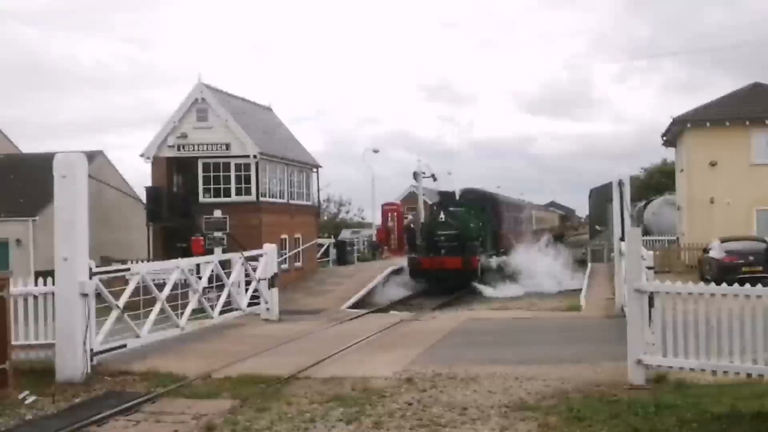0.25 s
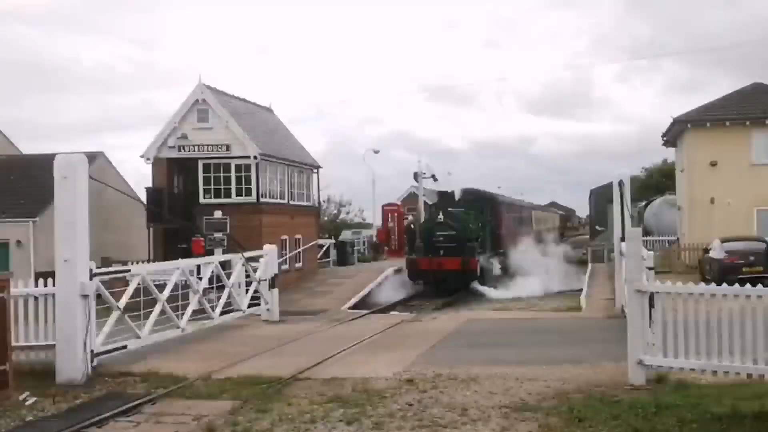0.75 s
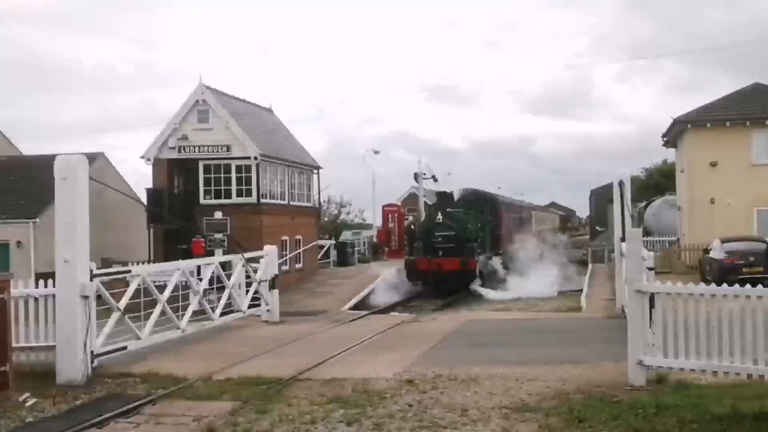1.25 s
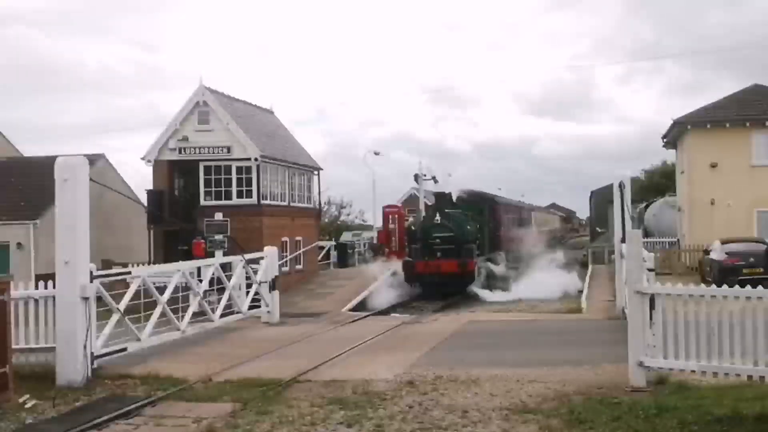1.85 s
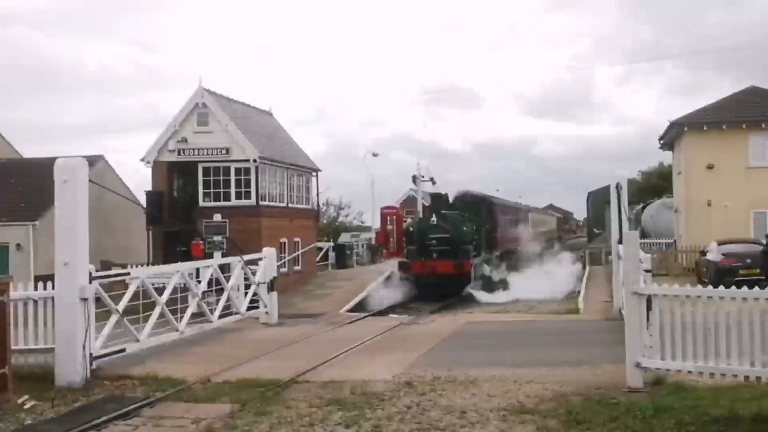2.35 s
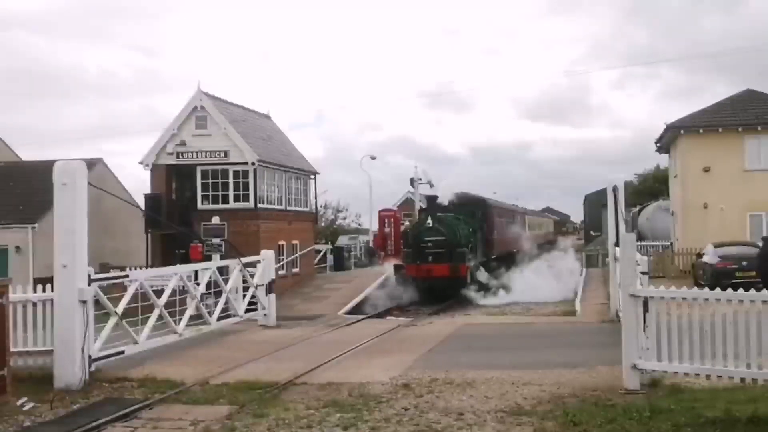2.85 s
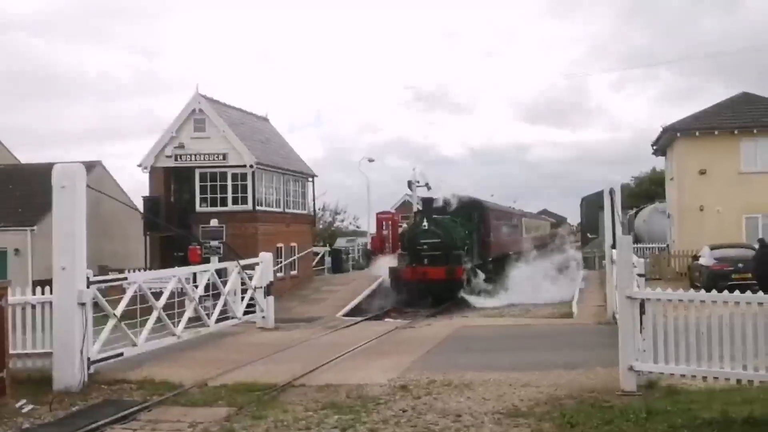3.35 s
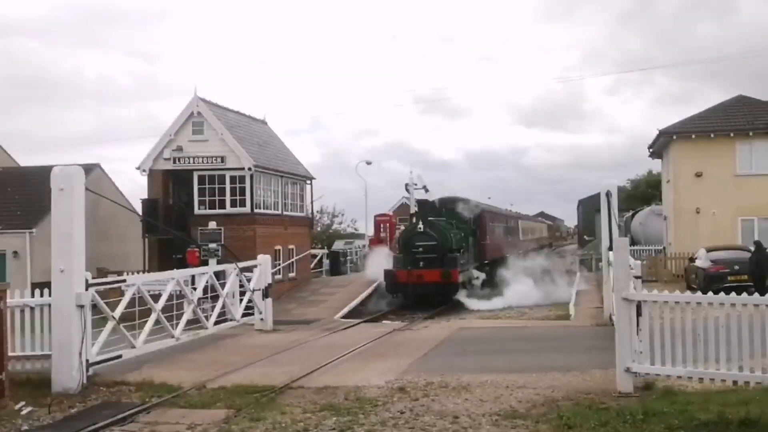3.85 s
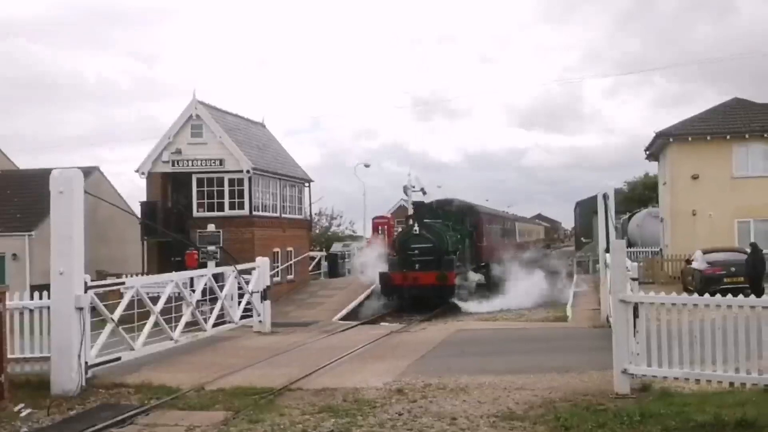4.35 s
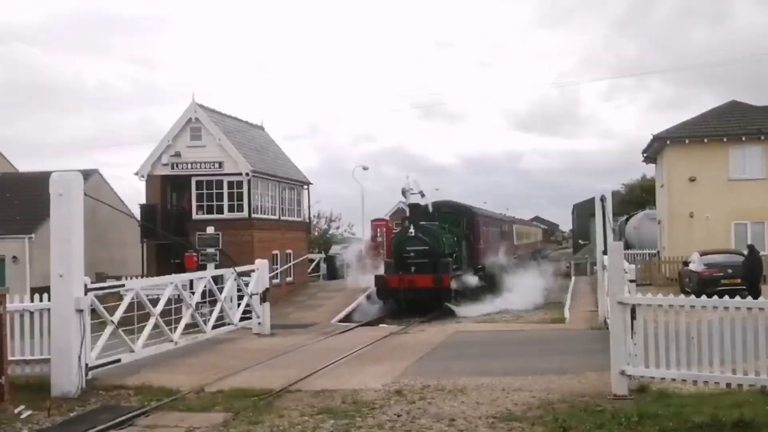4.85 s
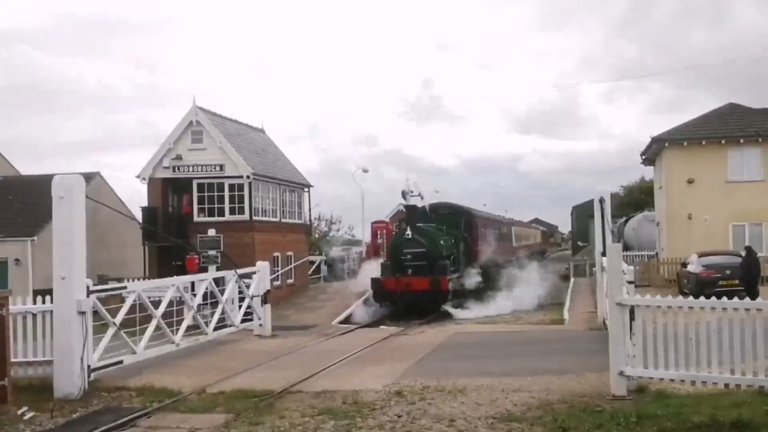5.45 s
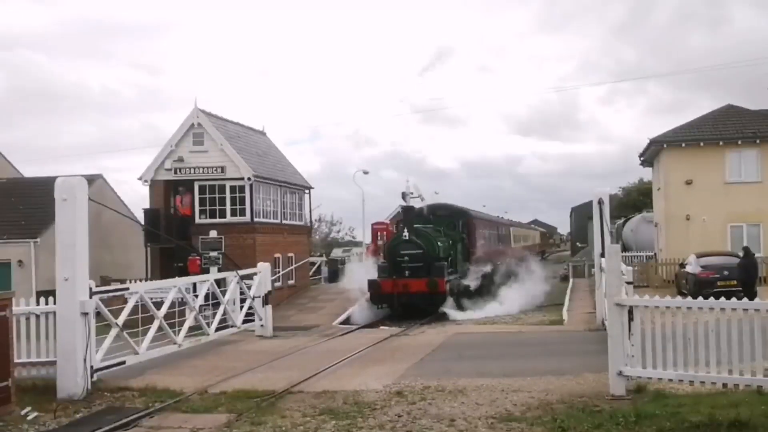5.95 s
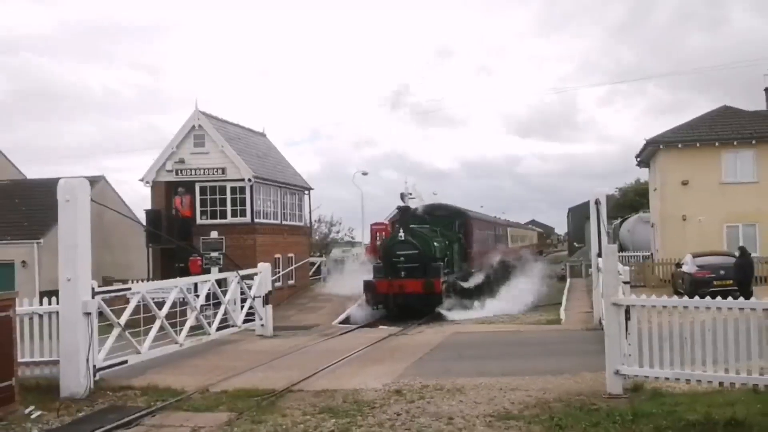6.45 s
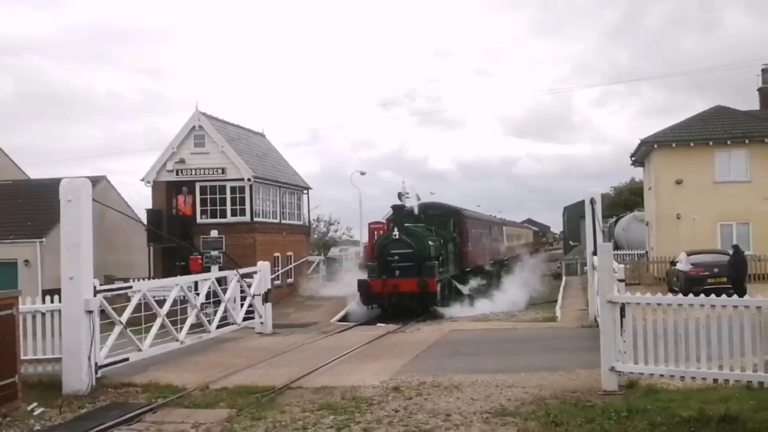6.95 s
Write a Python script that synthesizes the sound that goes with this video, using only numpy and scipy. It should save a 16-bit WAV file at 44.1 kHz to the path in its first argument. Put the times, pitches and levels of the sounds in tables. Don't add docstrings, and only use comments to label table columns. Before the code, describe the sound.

At an open-air railway crossing, a steam engine rolls off slowly, its drain cocks spraying a sharp, high hiss that falters and spurts. Soft wide puffs of steam rise and cut off at uneven intervals above a dull outdoor background and low far-off hum. Late on, wind buffets the single microphone with low thuds and crackly flaps; the hiss then drops away. The sound is close to mono, with a dull top end.

```python
import sys
import numpy as np
from scipy import signal
from scipy.fft import rfft, irfft
from scipy.io import wavfile
from scipy.ndimage import uniform_filter1d

SR = 44100
rng = np.random.default_rng(int(sys.argv[2]) if len(sys.argv) > 2 else 0)


def field_ratio(decibels):
    return 10 ** (np.asarray(decibels, dtype=float) / 20)


def transcribe(u):
    v = np.clip(np.atleast_2d(u).T, -1, 1)
    q = np.round(v * 32767).astype(np.int16)
    wavfile.write(sys.argv[1], SR, q)


N = 317961
HZ = np.arange(N // 2 + 1) * SR / N + 1e-3

# frequency in Hz, density in dB per Hz.
HISS_COLOUR = [(520, -41), (680, -23.5), (1000, -19.5), (1600, -19.5), (2200, -18.5), (2700, -14),
               (3100, -18.5), (4100, -13), (4900, -13.5), (5400, -12), (6700, -2), (7350, -6.5),
               (7600, -22), (7800, -43), (7880, -73.5)]
# frequency in Hz, width in Hz, lift in dB.
PIPE_MODES = [(1350, 22, 5), (2600, 460, 2), (3253, 100, 5), (3770, 61, -0.2), (4440, 180, 3),
              (5430, 450, 3.5), (6955, 290, 3)]
STEAM_EDGES_HZ = [2150, 3050, 5050]
# time in seconds, level in dB.
JET_PRESSURE = [(0, -41), (.38, -44), (.65, -38.5), (1.08, -38), (1.2, -35.5), (1.88, -36), (1.97, -39.5),
                (2.45, -38), (2.8, -45.5), (3.25, -47), (4.05, -43), (4.25, -44.5), (4.85, -39), (5.3, -44),
                (5.95, -40.5), (6.64, -42.5), (6.77, -53.5), (7.21, -51.5)]
# time in seconds, change in dB, length in seconds.
SPUTTERS = [(0.397, 0, 0.036), (0.763, -1, 0.016), (.92, -4, 0.027), (1.125, -4.5, 0.015),
            (1.167, 3.5, 0.025), (1.372, -2, .05), (1.556, 3.5, 0.019), (1.93, -10, 0.015),
            (1.968, -5, 0.0093), (2.128, -6, 0.013), (2.31, 3.5, 0.015), (3.4, -1, 0.014),
            (3.437, 3.5, .05), (4.08, 0.5, .03), (4.391, -3, 0.022), (4.72, -5, 0.026),
            (5.115, -3.5, 0.077), (5.36, 4.5, 0.099), (5.43, -4, 0.14), (6.243, -3, .08),
            (6.379, 2.5, 0.095), (6.459, -3.5, 0.036), (6.596, -2.5, 0.0076)]
# start in seconds, length in seconds, level in dB,
# brightness in dB, how far only the pipe sings in dB.
PISTON_BLOWS = [(0.21, 0.46, -53.5, -2, 0.5), (0.745, 0.39, -58, -4, 0), (2.053, .43, -51.5, -1, 0.5),
                (2.515, .58, -53.5, 6.5, 21.5), (3.18, 0.31, -60.5, -9, -1.5), (4.282, .42, -61.5, 1, -4.5),
                (4.799, 0.071, -59, 6.5, 1.5), (5.136, .1, -53.5, 4.5, 2), (5.302, .08, -54, 3.5, -0.5),
                (5.461, .11, -57.5, -3, -4.5), (5.637, .5, -62, 11, 3.5), (6.225, .47, -57.5, 5, 1.5),
                (7.028, .3, -67.5, -3.5, 3)]
REST_DB = [-56.5, -59, -61]
REST_FOLLOWS = [0.36, .05, -.05]
# time in seconds, frequency in Hz, change in dB.
GROUND_HOLLOW = [(0, 4900, 1.5), (.25, 4900, 0), (.95, 4850, -2.5), (1.15, 3300, -2.5), (1.9, 3300, -4),
                 (2.3, 3900, 1), (2.8, 4300, -0.5), (3.3, 4200, -7), (3.6, 4000, -5.5), (4.15, 3950, -7),
                 (4.35, 4100, -2), (4.75, 4300, -8.5), (5.08, 4300, -7.5), (5.2, 4300, -3),
                 (5.85, 4400, -5.5), (6.4, 4500, 4.5), (6.75, 4400, -13.5), (7.21, 4300, -5)]
# time in seconds, frequency in Hz, change in dB.
WALL_HOLLOW = [(0, 4900, -2), (2.5, 4900, 1.5), (2.85, 5000, -4.5), (3.2, 5000, 3), (3.6, 5100, -1.5),
               (4.2, 4900, -4), (4.4, 4900, 2), (4.9, 4950, -2.5), (5.15, 4930, 1), (7.21, 4900, 0)]
# time in seconds, frequency in Hz, change in dB.
PIPE_NOTE = [(0, 2720, 3), (.7, 2700, 0.5), (1.3, 2700, 2.5), (2.0, 2720, 1), (2.3, 2270, 2.5),
             (3.1, 2400, 3), (3.5, 1800, 4), (4.1, 1810, -4.5), (4.5, 2130, 4), (5.8, 2240, 5),
             (6.2, 2600, 0), (7.21, 2600, -2)]
# time in seconds, peak in dB, pitch in Hz, push 1 or suck -1.
SLAPS = [(5.122, -30, 188, 1), (5.182, -35, 169, 1), (5.19, -31, 258, 1), (5.326, -29, 230, 1),
         (5.372, -34.5, 241, 1), (5.401, -35, 217, 1), (5.439, -34, 300, 1), (5.496, -26.5, 188, 1),
         (5.509, -26.5, 177, 1), (5.547, -30, 280, 1), (5.59, -17.5, 247, -1), (5.663, -29.5, 162, 1),
         (5.684, -26, 265, -1), (5.721, -23, 230, -1), (5.728, -25, 400, 1), (5.736, -21.5, 420, -1),
         (5.746, -26, 445, 1), (5.762, -21.5, 420, -1), (5.781, -18, 294, 1), (5.86, -28, 199, -1),
         (5.904, -34, 210, 1), (6.023, -30.5, 152, -1), (6.047, -35, 247, 1), (6.082, -29, 318, 1),
         (6.097, -31.5, 358, 1), (6.272, -31, 225, 1), (6.281, -31, 352, -1), (6.308, -33.5, 218, -1),
         (6.335, -36, 338, 1), (6.532, -36, 210, 1)]
# time in seconds, rumble in dB.
BREEZE = [(0, -74), (.4, -74.5), (.9, -76.5), (1.8, -84), (2.7, -81.5), (3.3, -67.5), (4.7, -69),
          (5.05, -57), (5.5, -47.5), (6.05, -50), (6.2, -59), (6.55, -58.5), (6.66, -73), (7.21, -74)]
# middle in seconds, length in seconds, rumble in dB, flutter over rumble in dB.
GUSTS = [(.33, 0.13, -68, 8), (.82, 0.063, -73.5, -2), (1.524, 0.11, -77, 17.5), (2.226, 0.092, -70, 0),
         (2.55, 0.063, -76, -12), (2.827, 0.14, -67.5, 15), (3.346, 0.079, -56, 0),
         (3.433, 0.045, -54, -12), (3.562, 0.07, -65, 6.5), (3.823, 0.086, -63, 7), (4.797, .05, -57, 9),
         (4.883, .04, -64, 7), (5.036, 0.045, -50.5, -0.5), (5.141, 0.069, -48.5, 9),
         (5.232, 0.055, -46.5, 2), (5.415, 0.085, -45, -1), (5.548, 0.08, -47.5, 9),
         (5.59, 0.032, -51, 14.5), (5.662, .04, -49, 11.5), (5.74, 0.056, -44.5, 16.5),
         (5.803, 0.033, -39, -5), (5.883, 0.1, -54.5, 9), (6.035, 0.048, -48, 3), (6.09, 0.037, -37.5, -7),
         (6.273, 0.022, -48, 11), (6.342, 0.07, -52, 9.5), (6.394, .07, -50, 5), (6.526, 0.11, -44, -20.5),
         (6.788, 0.093, -55.5, 4), (6.964, 0.024, -48.5, -11)]
# time in seconds, change in dB, length in seconds.
DUCKS = [
    (5.592, -4.5, .03),
    (5.744, 1, 0.042),
]
# frequency in Hz, width in Hz, depth in dB.
BODY_DIPS = [(420, 110, -4.5), (834, 148, -13), (1220, 160, -2), (1630, 120, -4.5), (3635, 140, -6),
             (4060, 200, -8.5), (4760, 220, -2)]
# frequency in Hz, level in dB rms.
MOTOR_HUM = [(80.7, -56), (161.5, -69.5), (242.2, -71), (323.0, -77)]
# time in seconds, overtone change in dB.
MOTOR_LOAD = [
    (0, -10),
    (1.3, -1),
    (1.55, -5.5),
    (2.0, -3.5),
    (2.8, 2.5),
    (3.6, 2),
    (4.6, 0.5),
    (7.21, 0.5),
]
# frequency in Hz, density in dB per Hz.
FLOOR_COLOUR = [(60, -22.5), (102, 0.5), (125, -22.5), (250, -19.5), (500, -13), (690, -9), (1000, -15.5),
                (1400, -38), (2500, -58)]
# middle in seconds, length in seconds, lift in dB.
FAR_SWELL = (0.48, .6, 4.4)
# time in seconds, low edge in Hz, high edge in Hz, level in dB.
CHANNEL_SPLITS = [(0.687, 5800, 6850, -45), (.923, 4260, 6280, -51), (.967, 4270, 5680, -49),
                  (2.777, 6280, 7620, -50), (2.957, 4700, 5700, -58), (3.865, 6280, 7500, -46),
                  (3.864, 4960, 5680, -58), (4.867, 4840, 6000, -52.5), (5.261, 5800, 6850, -48)]


def rms_one(x):
    return x / np.sqrt(np.mean(x ** 2) + 1e-20)


def in_time(rows):
    s, *columns = np.transpose(rows)
    return [np.interp(np.arange(N) / SR, s, c) for c in columns]


def at_hz(points):
    hz, db = np.transpose(points)
    return np.interp(np.log(HZ), np.log(hz), db)


def bumps(modes):
    return sum(db / (1 + (2 * (HZ - hz) / width) ** 2) for hz, width, db in modes)


def bell(s, length):
    return 2 ** -(2 * (np.arange(N) / SR - s) / length) ** 2


def drift(rate):
    r = np.exp(-2 * np.pi * rate * 40 / SR)
    slow = signal.lfilter([1], [1, -2 * r, r * r], rng.standard_normal(N // 40 + 2002))[2000:]
    return np.interp(np.arange(N) / 40, np.arange(len(slow)), rms_one(slow))


def band(low_hz, high_hz, order):
    sos = signal.butter(order, [low_hz, high_hz], "band", fs=SR, output="sos")
    return rms_one(signal.sosfilt(sos, rng.standard_normal(N + SR))[SR:])


def evened(x, seconds):
    power = uniform_filter1d(x ** 2, size=int(seconds * SR))
    return rms_one(x / (power + .05) ** .4)


def power_db(parts):
    return 10 * np.log10(sum(part ** 2 for part in parts))


def steam_levels():
    attack_s, release_s, lower_under_db = 0.14, 0.023, -4.5
    pressure_db, = in_time(JET_PRESSURE)
    jet_db = pressure_db + sum(db * bell(s, length) for s, db, length in SPUTTERS)
    jet_swing_db = jet_db - np.mean(jet_db)
    parts = [[field_ratio(db + share * jet_swing_db)] for db, share in zip(REST_DB, REST_FOLLOWS)]
    t = np.arange(N) / SR
    for s, length, db, bright_db, sings_db in PISTON_BLOWS:
        rise = np.minimum(t - s, 0) / attack_s
        fall = np.maximum(t - s - length, 0) / release_s
        shape = np.exp(rise - fall)
        upper_db = bright_db - sings_db
        lower_db = lower_under_db - 0.24 * bright_db - sings_db
        for part, colour_db in zip(parts, [upper_db, 0, lower_db]):
            part.append(field_ratio(db + colour_db) * shape)
    return [jet_db] + [power_db(part) for part in parts]


def steam(levels_db, surge_db, patchy_db, slow_db):
    noise = rfft(rng.standard_normal(N)) * field_ratio(at_hz(HISS_COLOUR) + bumps(PIPE_MODES))
    noise /= np.sqrt(np.mean(irfft(noise * (HZ > 5200), N) ** 2))
    surge, out = drift(35.0), np.zeros(N)
    centres = np.log2(520) + np.arange(21) / 5
    jet_mean_db = np.mean(levels_db[0])
    swings_db = [level - np.mean(level) + jet_mean_db for level in levels_db[::-1]]
    upper_swing_db = levels_db[1] - np.mean(levels_db[1])
    moving = [in_time(rows) for rows in (GROUND_HOLLOW, WALL_HOLLOW, PIPE_NOTE)]
    moving = [(np.log2(hz), db) for hz, db in moving]
    for k, centre in enumerate(centres):
        part = np.searchsorted(STEAM_EDGES_HZ, 2 ** centre)
        level_db = swings_db[part] + patchy_db * drift(12.0)
        if part == 3:
            level_db = level_db + surge_db * surge
        else:
            level_db = level_db + slow_db * drift(0.45)
        level_db = level_db + 0.19 * upper_swing_db * np.exp(-((centre - np.log2(4100)) / 0.19) ** 2)
        if 7 < k < 18:
            for at, db in moving:
                level_db = level_db + db * np.exp(-((centre - at) / 0.15) ** 2)
        window = np.interp(np.log2(HZ), centres, np.eye(21)[k])
        out += field_ratio(level_db) * irfft(noise * window, N)
    return out


def echoes(x):
    at = np.arange(N)
    lags = [(.0061 + .0004 * at / N, -14), (.0173 - .0008 * at / N, -19)]   # (s, dB)
    return x + sum(field_ratio(db) * np.interp(at - np.round(lag * SR), at, x) for lag, db in lags)


def leak():
    centre_hz, width_hz, level_db = 1838, 305, -57
    shape = 1 / (1 + (2 * (HZ - centre_hz) / width_hz) ** 2)
    whistle = rms_one(irfft(rfft(rng.standard_normal(N)) * shape, N))
    return field_ratio(level_db + 1.6 * drift(0.36)) * whistle


def slaps():
    out = np.zeros(N + SR)
    crackle, snap = band(270, 680, order=2), band(800, 1700, order=2)
    for k, (s, peak_db, hz, push) in enumerate(SLAPS):
        cycles = np.arange(-600, 600) / SR * hz
        own = slice(1200 * k, 1200 * k + 1200)
        spike = np.cos(2 * np.pi * 0.78 * cycles) * np.exp(-1.8 * np.abs(cycles) ** 0.8)
        spike -= field_ratio(-6.5) * np.sin(2 * np.pi * 0.39 * cycles) * np.exp(-.6 * (cycles - .6) ** 2)
        crackle_gain = field_ratio(0.34 * peak_db - 4.5) * (hz / 340) ** 2.9
        spike += crackle_gain * crackle[own] * np.exp(-1.5 * cycles ** 2)
        snap_gain = field_ratio(1.9 * peak_db + 4.0) * (hz / 420) ** 5.1
        spike += snap_gain * snap[own] * np.exp(-.25 * cycles ** 2)
        middle = round(s * SR)
        out[middle - 600:middle + 600] += np.sign(push) * field_ratio(peak_db - 1.0) * spike
    return out[:N]


def wind_levels():
    breeze_db, = in_time(BREEZE)
    rumble = [field_ratio(breeze_db + 3 * drift(6.0))]
    flutter = [field_ratio(-66.5 + .55 * (breeze_db + 72.5) + 2.0 * drift(8.0))]
    for s, length, db, over_db in GUSTS:
        rumble.append(field_ratio(db) * bell(s, length))
        flutter.append(field_ratio(db + over_db) * bell(s, length))
    return power_db(rumble), power_db(flutter)


def wind():
    rumble_db, flutter_db = wind_levels()
    lumps = rms_one(field_ratio(1.5 * drift(40)))
    rumble = field_ratio(rumble_db) * evened(band(25, 86, order=2), seconds=0.015)
    flutter = field_ratio(flutter_db - 6.5) * evened(band(84, 248, order=2), seconds=0.0076)
    edge = field_ratio(1.5 * flutter_db - 2.5) * band(350, 590, order=2)
    rattle = field_ratio(2.8 * (flutter_db + 29.5) - 50.0) * band(460, 1500, order=2)
    return (rumble + flutter + edge + rattle) * lumps


def motor():
    turns = np.cumsum(1 + 0.0019 * drift(2.3)) / SR
    load_db, = in_time(MOTOR_LOAD)
    base_hz = MOTOR_HUM[0][0]
    hum = np.zeros(N)
    for k, (hz, db) in enumerate(MOTOR_HUM):
        waver_db = .6 + 3 * (k == 1) + 1.5 * (k > 1)
        level_db = db + (k > 0) * load_db + waver_db * drift(9)
        hum += np.sqrt(2) * field_ratio(level_db) * np.sin(2 * np.pi * (k + 1) * base_hz * turns + k)
    return hum


def outdoor_floor():
    floor = rms_one(irfft(rfft(rng.standard_normal(N)) * field_ratio(at_hz(FLOOR_COLOUR)), N))
    middle_s, length_s, lift_db = FAR_SWELL
    return field_ratio(-62.5 + lift_db * bell(middle_s, length_s) + 0.88 * drift(12.0)) * floor


def scene():
    levels_db = steam_levels()
    gain_db = -.55 * (uniform_filter1d(levels_db[0], size=SR // 3) + 48.5)
    hiss = steam(levels_db, surge_db=-0.5, patchy_db=1.0, slow_db=1.98)
    air = echoes(hiss) + field_ratio(gain_db) * (motor() + outdoor_floor() + leak())
    air = air * field_ratio(sum(db * bell(s, length) for s, db, length in DUCKS))
    through_body = irfft(rfft(air) * field_ratio(bumps(BODY_DIPS)), N)
    port = signal.sosfilt(signal.butter(4, 1900, fs=SR, output="sos"), wind() + slaps())
    mono = through_body + .16 * np.tanh(port / .16)
    return np.array([mono, mono])


def low_pass(x):
    return signal.sosfilt(signal.butter(12, 8210, fs=SR, output="sos"), x)


def record(dry):
    x = irfft(rfft(dry) * (HZ < 7890), N)
    grid = np.arange(1025) * SR / 2048
    fade = signal.windows.kaiser_bessel_derived(2048, 4 * np.pi)
    for s, low_hz, high_hz, db in CHANNEL_SPLITS:
        noise = rfft(rng.standard_normal(2048))
        patch = rms_one(irfft(noise * (grid > low_hz) * (grid < high_hz))) * fade
        middle = round(s * SR)
        x[:, middle - 1024:middle + 1024] += field_ratio(db) * patch * [[1], [-1]]
    x = x + field_ratio(-88.5) * band(11000, 15600, order=4)
    return low_pass(x)


dry = scene()
out = record(dry)
transcribe(out)
```